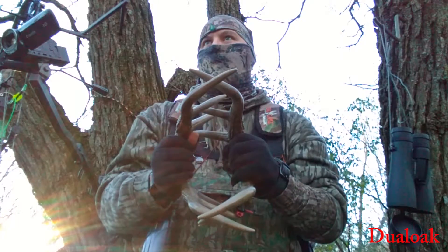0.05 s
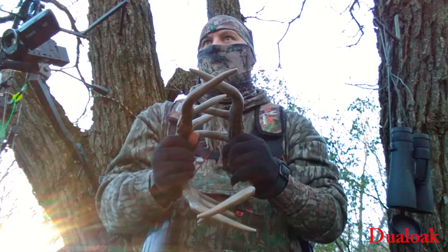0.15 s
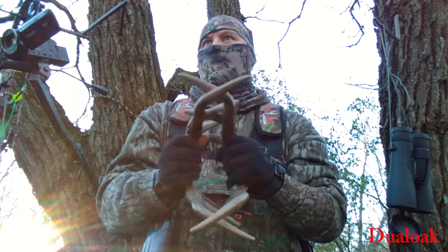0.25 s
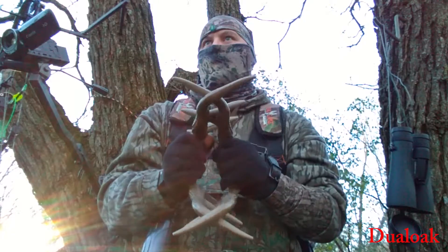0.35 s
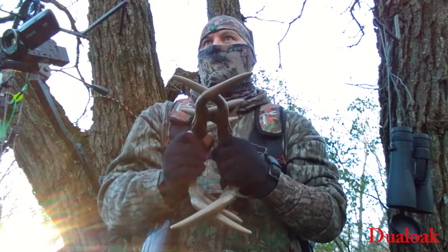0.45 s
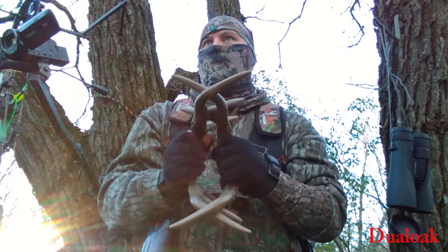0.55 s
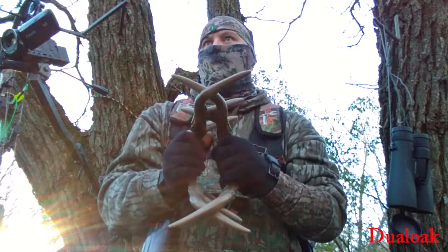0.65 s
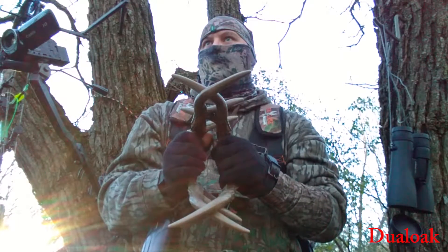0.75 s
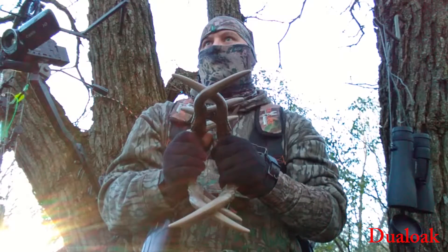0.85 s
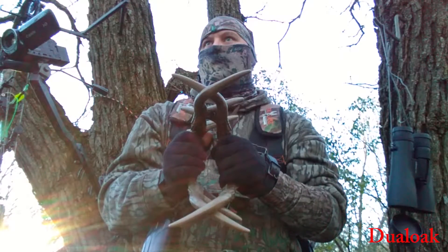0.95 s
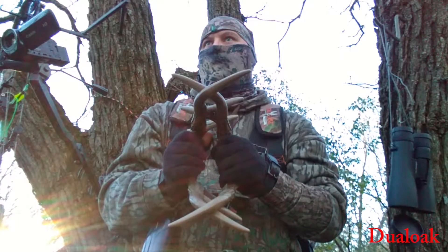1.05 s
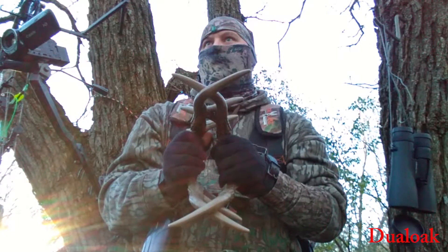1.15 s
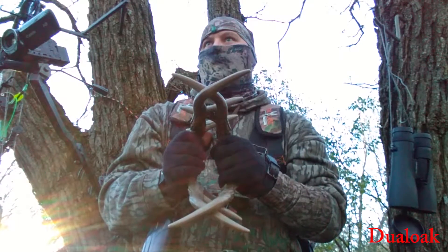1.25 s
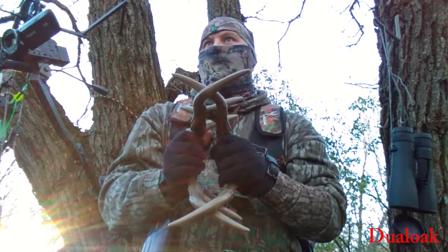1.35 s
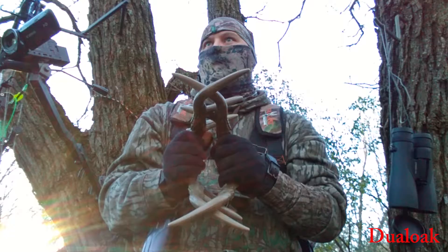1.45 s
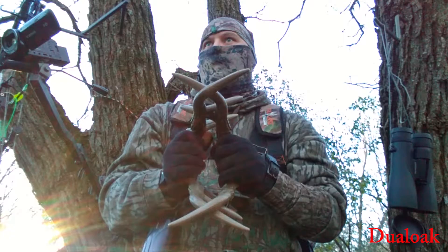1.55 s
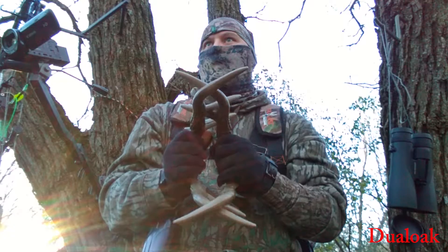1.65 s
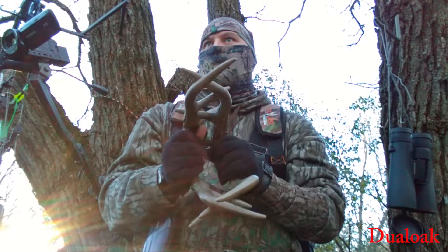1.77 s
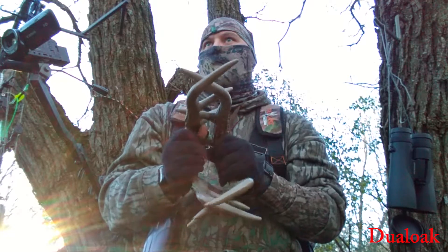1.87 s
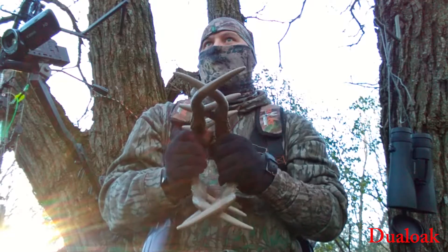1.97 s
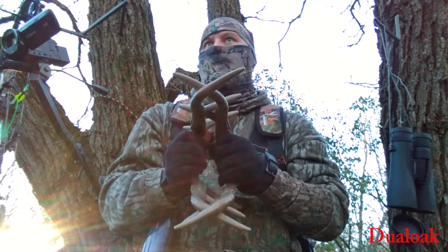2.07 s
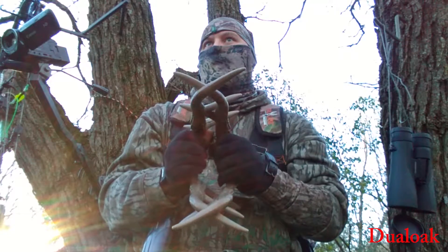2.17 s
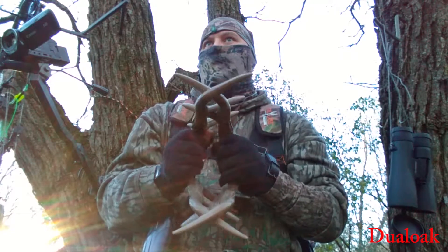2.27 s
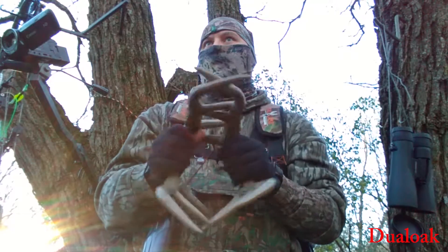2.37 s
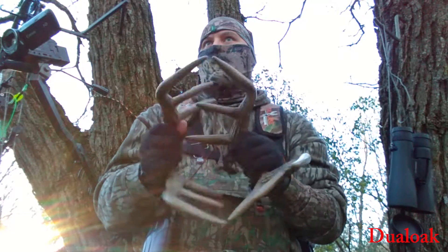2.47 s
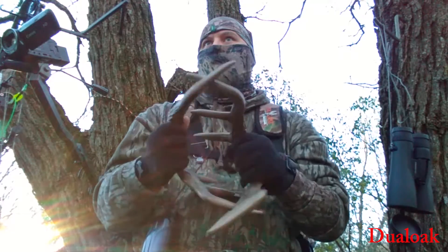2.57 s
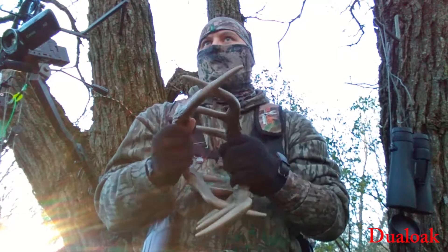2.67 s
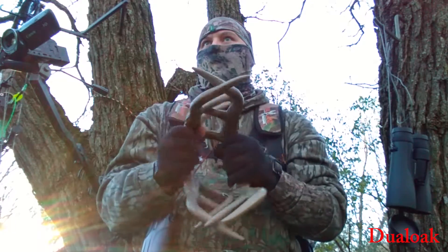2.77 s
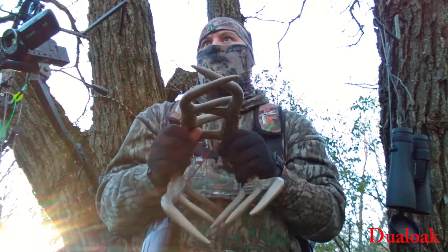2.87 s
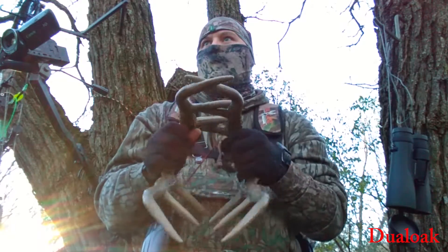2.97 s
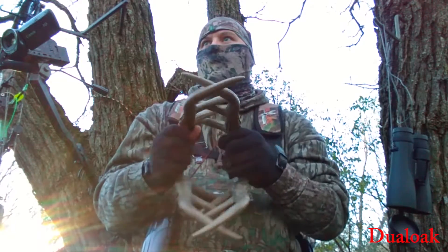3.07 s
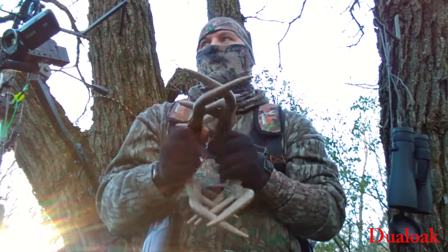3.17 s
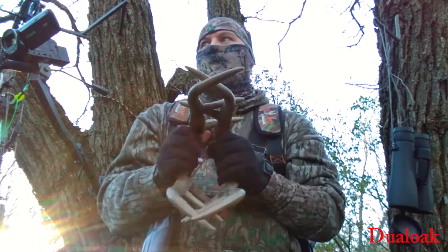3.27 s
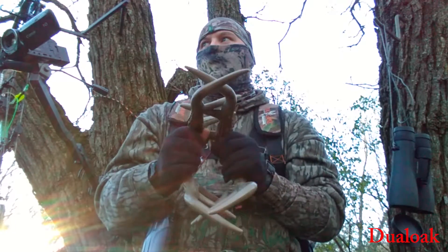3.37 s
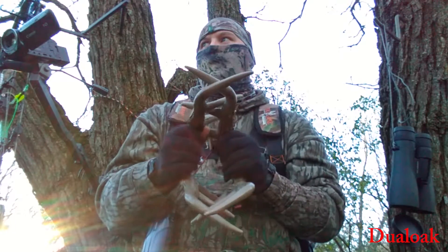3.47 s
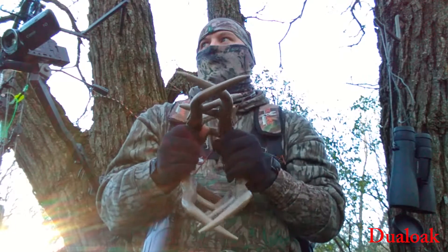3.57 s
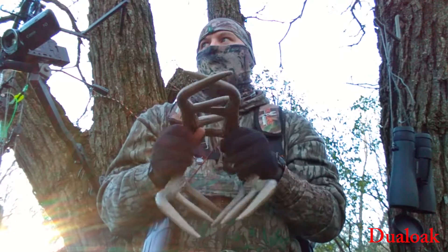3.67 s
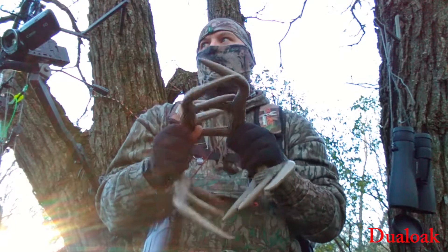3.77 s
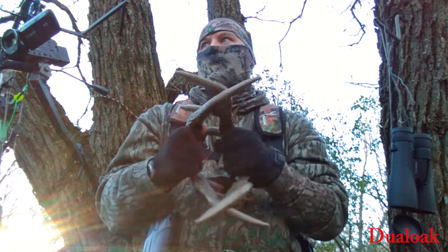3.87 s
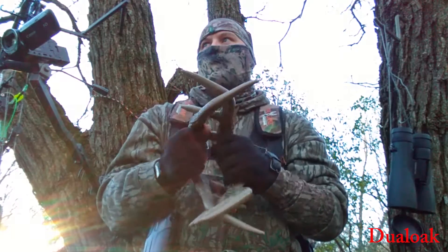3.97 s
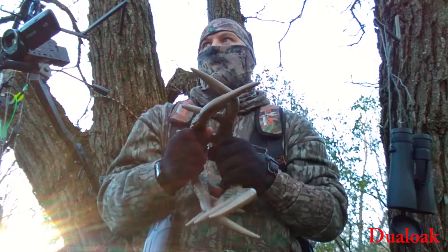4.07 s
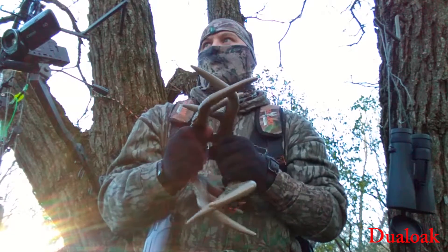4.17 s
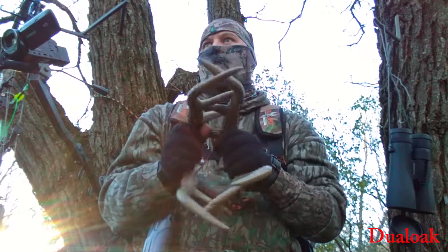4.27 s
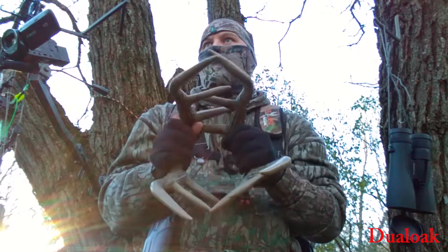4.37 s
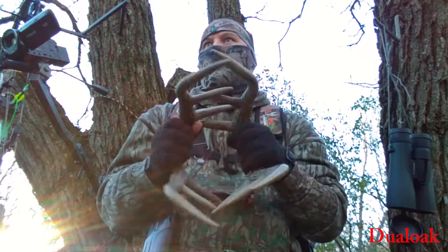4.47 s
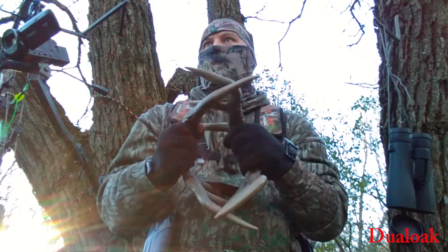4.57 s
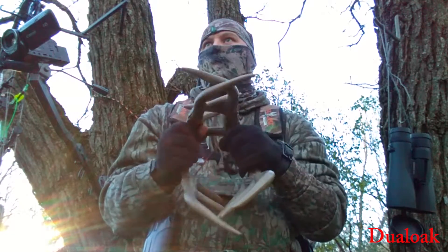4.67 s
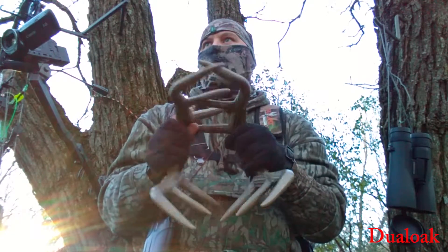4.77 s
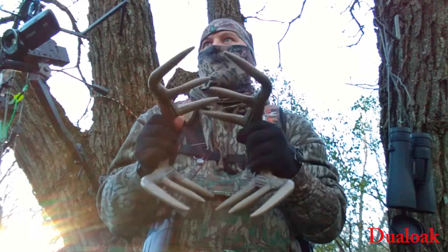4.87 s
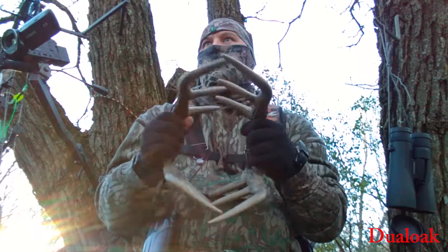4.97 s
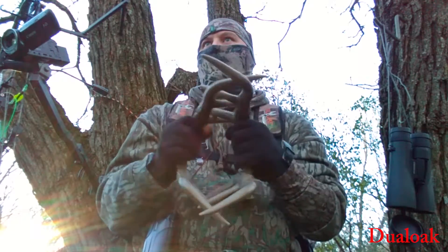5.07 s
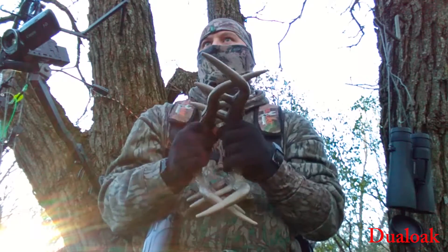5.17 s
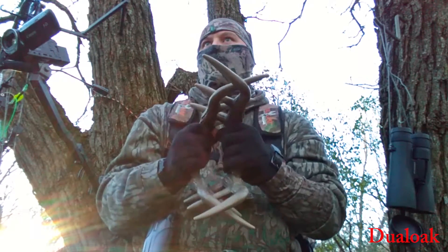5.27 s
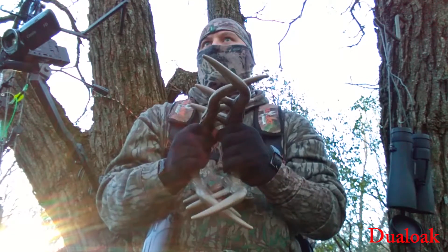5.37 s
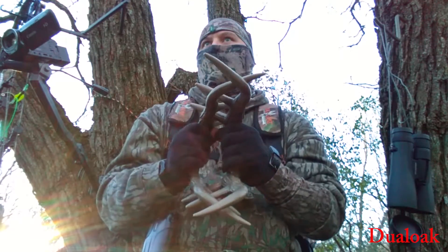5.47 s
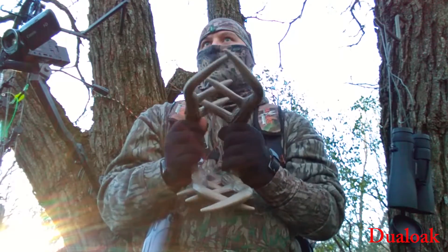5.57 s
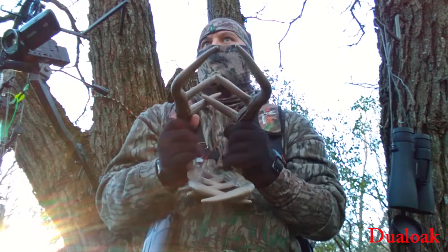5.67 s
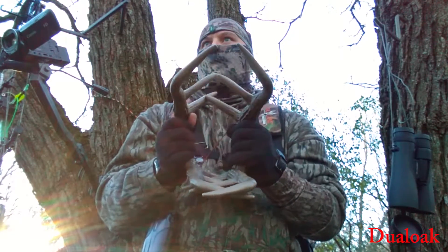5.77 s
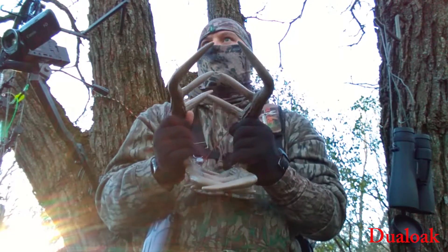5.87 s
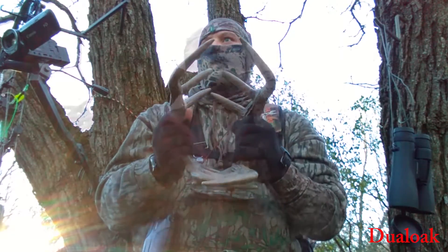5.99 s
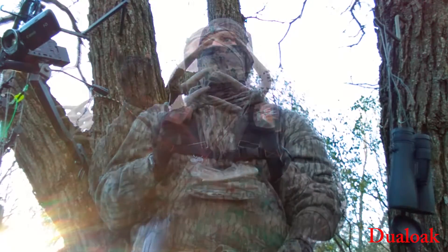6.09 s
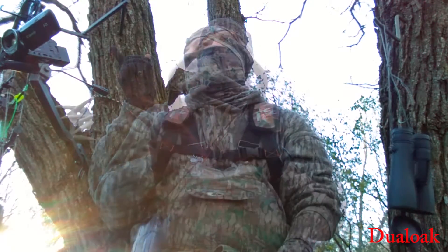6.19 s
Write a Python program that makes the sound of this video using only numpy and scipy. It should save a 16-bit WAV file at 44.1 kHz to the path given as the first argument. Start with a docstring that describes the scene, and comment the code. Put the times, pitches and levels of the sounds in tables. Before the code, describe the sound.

A pair of antlers is worked by hand an arm's length from a stereo microphone in quiet woodland, over faint distant hum and hiss. At 0.3-0.5 s a tight cluster of hard, dry bone clacks sounds. From 0.8 to 1.7 s a gust buffets the microphone with deep, blunt thumps, strongest around 1.1-1.2 s, striking left and right separately. Crisp knocks return at 1.75 and 2.0 s, then 2.4 s. From 2.6 to 3.45 s the clatter is dense and irregular, mixed with rubbing and creaky squeaks, with a sharp snap near 3.2 s and a very loud crack at 3.4 s. Knocks and slides resume at 3.75-4.0 s, looser clusters at 4.5-4.75 s, a strong volley at 5.1-5.2 s, fading scrape, and light taps around 5.6-5.7 s. Thin, diffuse echoes from the trees follow; the end is nearly still.

```python
"""In a wood, an arm's length from a two-port microphone, a pair of antlers is clacked and ground by hand.
A faint far hum and the microphone's hiss lie under a gust that buffets each port separately.
Each contact rings the bone's butts, beams, tines and tips, then rebounds softly; slides scrape and squeak.
Bone is noise forces through modes plus decaying sines; the trees answer with a thin, decaying noise tail."""
import sys
import numpy as np
from scipy import signal
from scipy.fft import rfft, irfft, next_fast_len
from scipy.io import wavfile
from scipy.ndimage import map_coordinates

SR = 44100
rng = np.random.default_rng(int(sys.argv[2]) if len(sys.argv) > 2 else 0)


def digitize_waveform(pressure):
    """Quantize a signal to 16-bit integers and store it at the path in sys.argv[1].

    Rows of a 2-D input are taken as channels; values are limited to [-1, 1].
    """
    field = np.atleast_2d(pressure).T
    bounded = np.clip(field, -1, 1)
    quanta = np.round(bounded * 32767).astype(np.int16)
    wavfile.write(sys.argv[1], SR, quanta)


N = 274787


def amp(db):
    """Decibels to amplitude."""
    return 10 ** (np.asarray(db) / 20)


def unit(x):
    """Scale to an RMS of 1 along the last axis."""
    return x / np.sqrt(np.mean(x ** 2, axis=-1, keepdims=True) + 1e-20)


def along(points, hz):
    """Read (f/Hz, value) points on a log frequency axis."""
    f, v = np.transpose(points)
    return np.interp(np.log(hz + 1), np.log(f + 1), v)


def wobble(rate):
    """A smooth random curve for each channel, rate knots a second."""
    knots = rng.standard_normal((2, int(N * rate / SR) + 4))
    return np.array([map_coordinates(k, [np.arange(N) * rate / SR]) for k in knots])


def filtered(x, response):
    """x times a response of frequency."""
    m = next_fast_len(N + SR // 2)
    return irfft(rfft(x, m) * response(np.fft.rfftfreq(m, 1 / SR)), m)[..., :N]


# Colour of the far hum and hiss: f/Hz, relative density level/dB per Hz
FAR_COLOUR = [(15, -52.5), (25, -26), (128, -7.5), (226, -25.5), (313, -5.5), (669, -17), (766, -16),
              (2820, -28), (3910, -30.5), (14800, -32.5), (16500, -43.5)]
# How alike the two ports hear it: f/Hz, left-right correlation (1 = the same)
FAR_LIKENESS = [(60, 1), (200, 1), (400, 0.41), (800, 0.11), (1500, 0)]


def far():
    """Steady distant hum, alike at both ports, and microphone hiss, unrelated: mid and side noise."""
    def response(hz):
        turn = np.arccos(np.clip(along(FAR_LIKENESS, hz), -1, 1)) / 2
        return amp(along(FAR_COLOUR, hz)) * [np.cos(turn), np.sin(turn)]

    mid, side = filtered(rng.standard_normal((2, N)), response)
    return amp(-63.0) * unit(np.array([mid + side, mid - side]))


# Course of the gust: t/s, buffet level/dB before the layer gains, left over right/dB
GUST_COURSE = [(0, -50.5, -1), (.55, -50, -3.5), (.8, -41, 9.5), (0.929, -42.5, -11), (1.05, -40, 0),
               (1.2, -32, 18), (1.4, -41.5, 0), (1.47, -35, -8.5), (1.62, -38, 3), (1.75, -46, -4),
               (2.3, -60, -3), (2.901, -61, -2), (3.1, -43.5, 2), (3.3, -67, -9), (3.902, -69.5, 5.5),
               (3.999, -50, 1), (4.6, -72, 1), (6.23, -70.5, -3.5)]
# Colour of the buffeting: f/Hz, relative density level/dB per Hz
BUFFET_COLOUR = [(12, -41), (20, -12.5), (91, 1), (169, -6.5), (464, -23.5), (642, -29), (905, -47),
                 (1500, -66), (1950, -92.5), (3300, -120)]
# Large eddies hitting a port: t/s, port (0 left, 1 right), level/dB of the bump without its crest,
# f/Hz setting the bump's speed
EDDIES = [(0.8026, 0, -21, 69), (0.987, 0, -23.5, 149), (1.0181, 1, -23.5, 162), (1.096, 1, -7, 160.6),
          (1.1133, 1, -6, 165), (1.1503, 0, -16.5, 136), (1.1767, 0, -8, 143), (1.195, 0, -15, 73),
          (1.2026, 0, -14.5, 260), (1.2441, 0, -14, 215), (1.2742, 0, -15, 232), (1.436, 1, -21, 220),
          (1.505, 1, -30, 260), (1.541, 0, -26, 200), (1.542, 1, -30, 230), (1.683, 1, -27, 260),
          (1.464, 1, -24, 315), (1.5806, 1, -21.5, 209), (1.6164, 1, -27, 227), (1.6829, 0, -29, 190),
          (2.126, 1, -34.5, 167)]


def wind():
    """Turbulence, unrelated at the two ports: a rumble, a patter of small eddies and single large ones."""
    s, db, pan_db = np.transpose(GUST_COURSE)
    t = np.arange(N) / SR
    left = np.interp(t, s, db + pan_db / 2)
    right = np.interp(t, s, db - pan_db / 2)
    level = amp(np.array([left, right]))
    colour = lambda hz: amp(along(BUFFET_COLOUR, hz))
    rumble = unit(filtered(rng.standard_normal((2, N)), colour) * amp(1.9 * wobble(25)))
    hits = rng.random((2, N)) < 70 / SR  # about 70 small eddies a second at each port
    size = rng.standard_normal((2, N)) * amp(1.2 * rng.exponential(size=(2, N)))
    patter = unit(filtered(hits * size, colour))
    out = level * (amp(-1.5) * rumble + amp(-8) * patter)

    u = np.arange(-1200, 1200) / SR
    crest = (1 - (u / 0.00057) ** 2) * np.exp(-(u / 0.00061) ** 2 / 2)
    for s, port, db, hz in EDDIES:
        v = u * hz * 4.23
        bump = (1 - v * v) * np.exp(-v * v / 2)  # one swing between two opposite ones
        sharp = 0.18 * (hz / 200) ** 2.7  # small fast eddies have the sharper crest
        thump = rng.choice([-1, 1]) * amp(db) * (bump + sharp * crest)
        out[round(port), round(s * SR) - 1200:][:2400] += thump
    return out


def contact_shapes(t):
    """Pressure of a blow, a skid and a fading drag, for butt, beam, tine, tip and crack in turn."""
    def shape(blow_t60, skid_db, skid_t60, drag_db, drag_t60):
        blow = amp(-60 * t / blow_t60)
        skid = amp(skid_db - 60 * t / skid_t60)
        drag = amp(drag_db - 60 * t / drag_t60)
        return (1 - np.exp(-t / .0002)) * (blow + skid + drag)

    low = shape(0.0037, -11.0, 0.065, -26.5, 0.15)
    tine = shape(0.0058, -9.5, 0.05, -23, 0.047)
    tip = shape(0.011, -11.0, 0.038, -20.5, 0.053)
    crack = shape(0.0032, -13.0, 0.029, -28.5, .12)
    return np.array([low, low, tine, tip, crack])


# Contacts: t/s, tine level/dB, beam over tine/dB, tip over tine/dB, then f/Hz of each mode that rings out;
# levels drive the parts before their own gains
CONTACT_ROWS = [(0.317, -34.5, 3.5, -10, 1180), (0.326, -37, 14, -1.5, 1194),
                (0.3341, -14.5, 0, -5.5, 1225, 1610), (0.3411, -20.5, -3, -26, 1176),
                (0.3564, -7.5, 0.5, -6, 2890, 1167, 1610), (0.3688, -22.5, 2, -0.5, 1650),
                (0.4211, -28, 2, -6.5, 2930), (0.4916, -45, 13.5, -14, 1530), (1.7233, -44.5, 1, -22, 649),
                (1.7561, -13, 1.5, -9, 2927, 1420, 690), (1.769, -17, 2.5, -2, 2945, 6700),
                (1.7801, -18.5, -1, -14, 1108), (1.7896, -31.5, 7.5, 1.5, 1200),
                (1.8179, -35.5, 5, 11, 1750), (1.8401, -48.5, 2, 13.5, 1140), (1.943, -30.5, 5, -26, 1164),
                (1.9839, -13.5, -2.5, -7, 2925), (1.9888, -9.5, -3.5, 0, 2920, 4560),
                (2.0052, -22, 12.5, -14.5, 1217), (2.0195, -38, 14, -4.5, 1440),
                (2.0277, -18, -4, -4.5, 3300, 4450), (2.0936, -44, -5, -15, 2950),
                (2.3767, -41.5, 10, -21.5, 2970), (2.3883, -40, 10.5, -12, 3140),
                (2.4048, -11.5, -9.5, -10, 3670, 1787, 2153), (2.415, -36, 11, -18, 1216),
                (2.4441, -34, 3.5, -20.5, 1390), (2.4594, -37, -5, -3, 1440),
                (2.5788, -22, 3.5, -1, 3850, 1421), (2.6004, -25.5, 4, -8.5, 2940, 1540),
                (2.6143, -11, -2.5, 1.5, 4720, 1141, 2498), (2.6459, -17.5, 1.5, -7, 1163, 3101, 2250),
                (2.6606, -21, 0.5, -5, 1152, 3015, 3725), (2.683, -15, 5.5, -9, 2875, 2509, 1475),
                (2.7008, -13, 3, -6.5, 2552, 1141), (2.7509, -24, -3, -1, 2180),
                (2.7694, -34, -5, -15, 2864, 3348), (2.7817, -35, -2.5, -18, 2050),
                (2.807, -22, 8.5, -3, 1906), (2.8355, -31, 10.5, -8, 1126), (2.8496, -36, 9, -21, 1147),
                (2.8814, -14.5, 0.5, -6.5, 1378, 1927, 2200), (2.9028, -30.5, 11, -12.5, 1070),
                (2.917, -26, -4, -12, 1170), (2.9455, -31, 3, -9.5, 1510),
                (3.0361, -16.5, -4, -9, 1228, 2013), (3.0838, -18.5, 1, -4, 1970, 3058),
                (3.109, -20, -5.5, -0.5, 4253, 2003), (3.1661, -15.5, -2.5, 0, 2842, 5168),
                (3.1776, -21, -9.5, 3, 1500), (3.1848, -22.5, 7.5, -9, 1645),
                (3.1914, -16.5, -7.5, -3, 2420, 1809, 1453), (3.234, -22, 4.5, -14.5, 1506),
                (3.2617, -17, 0.5, -10, 926, 2972, 2056), (3.3144, -34.5, 5, -4.5, 1150),
                (3.3427, -16.5, -0.5, -4.5, 1432, 2896), (3.3785, -39, 4.5, -26.5, 1190),
                (3.4117, -4.5, -5.5, -4.5, 1647, 2896), (3.4279, -15, 0, 1.5, 1669, 4134),
                (3.445, -20, -3, 2, 1470), (3.567, -36, 7.5, -16, 1154), (3.6493, -32, 4.5, -27.5, 2915),
                (3.6746, -47.5, 18.5, -10, 1087), (3.695, -45, 12, -15, 1152),
                (3.7478, -20.5, -23.5, -14, 1077, 2283, 3252), (3.7897, -27, -9, -11, 1238, 3176),
                (3.8341, -25.5, 5, -1, 1195, 1572), (3.877, -9, 4.5, -3.5, 1480),
                (3.9022, -44.5, 16, -3, 1190), (3.9205, -31, 12, -10.5, 1505),
                (3.9432, -11.5, -3, -9, 1195, 1475), (3.95, -18.5, 10, -4.5, 1180),
                (3.965, -11.5, 2, -4, 1658, 689), (3.9728, -23.5, 3, -1, 670),
                (4.058, -33, 7.5, -13, 937, 1184), (4.0962, -35.5, 1, -20, 1927),
                (4.1192, -38, -7, -2, 1415), (4.1261, -39.5, -10, 1, 1446), (4.3122, -43, 4, -19.5, 1260),
                (4.366, -23.5, 11.5, -4, 1576), (4.5049, -44.5, 9.5, -8, 1373),
                (4.5235, -20.5, -14, -9, 3758, 3090), (4.575, -29, 2, -20.5, 1530),
                (4.5882, -18.5, 3.5, 0, 1647, 2918, 1389), (4.618, -17.5, -7, -3, 1940),
                (4.627, -35.5, 6, -9, 1990), (4.6373, -30.5, 4, -14.5, 1735),
                (4.699, -30, 3.5, -14.5, 1129), (4.7248, -36.5, 12.5, 7, 1140),
                (4.7462, -14, -20.5, -3, 2638, 1163), (4.7587, -42.5, 19, -32, 2530),
                (4.7887, -41, 16, -10, 1090), (4.8299, -50, 12, -20, 1195), (5.0337, -31, 1.5, 0, 4260),
                (5.0601, -28, 0.5, -4, 2422, 1755), (5.1163, -14, -9.5, -10, 3101, 1981, 2455),
                (5.144, -33.5, 9.5, -25, 1610), (5.1538, -13.5, -7.5, -6, 3122, 2089, 1077),
                (5.166, -19.5, -13, 5, 2060), (5.1693, -7.5, 0, -11, 2013, 3112, 1174),
                (5.1954, -28, 5.5, -22, 1130), (5.2104, -10, -0.5, -4.5, 1453, 1184, 2767),
                (5.234, -40, -15, -11, 1150), (5.256, -42.5, 11, -7, 1460), (5.2794, -56, 12, -10, 1163),
                (5.2996, -59, 13, -5, 1570), (5.6231, -31, 5, -16, 3030),
                (5.627, -24, 1.5, -9.5, 2939, 991), (5.64, -34, 13, -19, 1008), (5.6549, -33, 3, -10, 1427),
                (5.7303, -32.5, -5.5, -14, 3714, 3144, 1529)]
# Sharp treble snaps: t/s, level/dB of the crack's drive
SNAP_ROWS = [(2.698, -33), (3.1782, -13.5)]
# Colour of the contact's crack: f/Hz, relative density level/dB per Hz
CRACK_COLOUR = [(7000, -33), (9000, -7.5), (10000, -7.5), (12000, 4.5), (15000, 0), (17000, -7.5)]
# Bone modes, low to high: f/Hz, relative level/dB, basic t60/s
BONE_MODES = [(496, -5, 0.011), (692, 1.5, 0.036), (915, -2, .015), (1145, 5.5, 0.044), (1430, 1, 0.012),
              (1773, -2, 0.0055), (2037, -0.5, 0.013), (2507, 0, 0.016), (2858, 2.5, 0.017),
              (3075, 2, 0.016), (3444, -3.5, 0.0075), (3770, -2.5, 0.02), (4100, 2.5, 0.0066),
              (4330, -0.5, 0.006), (4604, 1.5, 0.015), (5290, -5.5, 0.0086), (5540, -6, 0.011),
              (6100, -9.5, .01), (6640, -5, 0.0068), (7610, -10.5, 0.0072), (8350, -13.5, 0.0079)]
BUTT, BEAM, TINE, TIP = BONE_MODES[:3], BONE_MODES[3:6], BONE_MODES[6:12], BONE_MODES[12:]


def antlers():
    """Contacts, rebounds and slides push on butts, beams, tines and tips, each at its own strength."""
    t = np.arange(round(.15 * SR)) / SR
    shapes = contact_shapes(t)
    push, ring = np.zeros((5, N + SR)), np.zeros(N + SR)
    for s, db, beam_db, tip_db, *modes in [*CONTACT_ROWS, *rebounds()]:
        at = round(s * SR)
        part_db = np.array([[0.87 * beam_db], [beam_db], [0], [tip_db], [tip_db - 24]])
        push[:, at:at + len(t)] += amp(db + part_db) * shapes
        sines = np.sin(2 * np.pi * np.outer(modes, t)).sum(0) / len(modes) ** .3
        ringing_out = amp(max(beam_db, 0, tip_db) + 1.0 - 60 * t / .035) * sines
        tine_ring = amp(-2.0) * struck(TINE, t, spread_db=4.5)
        tip_ring = amp(tip_db + 1.5) * struck(TIP, t, spread_db=10)
        onset = 1 - np.exp(-t / 0.00052)
        ring[at:at + len(t)] += amp(db) * onset * (ringing_out + tine_ring + tip_ring)
    for s, db in SNAP_ROWS:
        push[4, round(s * SR):][:len(t)] += amp(db) * shapes[4]

    slide, squeak = strokes()
    push = push[:, :N] + amp([[-14], [-5.5], [-9], [-13], [-24]]) * slide
    butt = resonate(slips(push[0], apart=.45, lumps_db=2.5), BUTT, low_hz=250, high_hz=2500)
    beam = resonate(slips(push[1], apart=0.23, lumps_db=4.5), BEAM, low_hz=530, high_hz=4000)
    tine = resonate(slips(push[2], apart=0.65, lumps_db=2.5), TINE, low_hz=920, high_hz=8200)
    tip = resonate(slips(push[3], apart=0.91, lumps_db=2.0), TIP, low_hz=2110, high_hz=12000)
    edge = lambda hz: unit(amp(along(CRACK_COLOUR, hz)))
    crack = filtered(slips(push[4], apart=0.92, lumps_db=3.0), edge)
    grit = lambda hz: unit(1 / (1 + 1500 / (1j * hz + 1e-9)) ** 2 / (1 + 1j * hz / 8000) ** 4)
    scrape = filtered(slips(slide, apart=0.85, lumps_db=4.5), grit)  # the dry hiss of the rough surfaces
    bone = amp(-5) * butt + amp(2.0) * beam + amp(2.5) * tine + amp(3.5) * tip
    bone = bone + amp(4.0) * crack + ring[:N] + squeak + amp(-17.0) * scrape
    # the left port is a little nearer: 7 microseconds early, the right as much late
    lead = lambda hz: np.exp(2j * np.pi * hz * 7e-6 * np.array([[1], [-1]]))
    return filtered(bone, lead)


def slips(envelope, apart, lumps_db):
    """Rough bone on bone: a lumpy noise force, part common to both ports and part (apart) their own."""
    common, own = rng.standard_normal(N), rng.standard_normal((2, N))
    noise = (common + apart * own) / np.hypot(1, apart)
    return envelope * amp(lumps_db * wobble(260)[0]) * noise


def resonate(force, modes, low_hz, high_hz):
    """A force through one part of the bone; the part radiates little outside its own range."""
    def response(f):
        peaks = 0
        for k, (hz, db, t60) in enumerate(modes):
            t60 = min(t60, 70 / hz)  # no mode outlasts 70 cycles
            damping = 1j * f * np.log(1000) / np.pi / t60
            peaks = peaks + (-1) ** k * amp(db) * 1j * f / t60 / (hz * hz - f * f + damping)
        levelled = unit(np.abs(peaks)) * np.exp(1j * np.angle(peaks))
        return levelled / (1 + low_hz / (1j * f + 1e-9)) ** 3 / (1 + 1j * f / high_hz) ** 3

    return filtered(force, response)


def struck(modes, t, spread_db):
    """Free ringing after one blow: where it lands sets every mode's strength anew; energy of one sine."""
    hz, db, t60 = np.transpose(modes)[..., None]
    size = amp(db + spread_db * rng.standard_normal(db.shape))
    decay = amp(-60 * t / (1.2 * t60))
    return np.sum(size * decay * np.sin(2 * np.pi * hz * t), axis=0) / np.linalg.norm(size)


def rebounds():
    """Rows like the contacts: one softer, duller touch soon after each, ringing a beam mode."""
    soonest_s, mean_extra_s, loss_db, scatter_db = .007, .006, 27, 2
    s, db, beam_db = np.transpose([row[:3] for row in CONTACT_ROWS])
    wait, choice = rng.random((len(s), 2)).T
    size, beam, tip, bend = rng.standard_normal((len(s), 4)).T
    when = s + soonest_s - mean_extra_s * np.log(1 - wait)
    level = db + np.maximum(beam_db, 0) - loss_db + scatter_db * size
    beam_hz = np.array([hz for hz, _, _ in BEAM])
    mode_hz = beam_hz[(choice > .7).astype(int)] * (1 + .04 * bend)
    return np.transpose([when, level, 8.5 + 2.1 * beam, -12.5 + 6 * tip, mode_hz])


# Sliding strokes: start t/s, end t/s, pressure level/dB before the part gains,
# squeak f/Hz at the start, squeak f/Hz at the end (both before the pitch wobble)
STROKE_ROWS = [(0.498, 0.522, -68, 1220, 1200), (1.96, 2.02, -56.5, 1300, 1480),
               (2.045, 2.136, -63.5, 1240, 1270), (2.406, 2.484, -51.5, 1180, 1230),
               (2.585, 2.788, -54.5, 1186, 1123), (2.822, 2.974, -52.5, 1150, 1170),
               (3.379, 3.396, -54, 1020, 1170), (3.65, 3.705, -58, 1130, 1150), (3.7, 3.75, -58, 990, 1130),
               (3.754, 3.798, -64, 1060, 1230), (3.831, 3.958, -54, 1160, 1170),
               (3.996, 4.095, -60.5, 1210, 1180), (4.269, 4.371, -60.5, 1150, 1180),
               (4.361, 4.475, -59.5, 1560, 1380), (4.525, 4.599, -53.5, 1600, 1400),
               (4.62, 4.699, -57.5, 1907, 1705), (4.755, 4.851, -55, 1118, 1174),
               (5.21, 5.319, -61, 1200, 1180), (5.584, 5.629, -64.5, 970, 1020)]


def strokes():
    """One antler slides on the other: pressure swells and fades, and stick-slip squeaks at a gliding pitch."""
    t = np.arange(N) / SR
    pressure, pitch = np.zeros(N), np.zeros(N)
    for start, end, db, from_hz, to_hz in STROKE_ROWS:
        part = np.clip((t - start) / (end - start), 0, 1)
        pressure += amp(db) * np.sin(np.pi * part) ** .5
        pitch = np.where(part > 0, from_hz + (to_hz - from_hz) * part, pitch)
    pitch = pitch * (1 + 0.028 * wobble(30)[0] + 0.04 * wobble(180)[0])
    squeak_level = pressure * amp(5.2 + 3.3 * wobble(83)[0])
    return pressure, squeak_level * np.sin(2 * np.pi * np.cumsum(pitch) / SR)


def tail(decays, seconds):
    """A stereo noise tail of energy 1 a channel whose frequencies die at their own speeds."""
    noise = rng.standard_normal((2, round(seconds * SR)))
    hz, t, z = signal.stft(noise, SR, nperseg=128)
    fade = amp(-60 * t / np.abs(along(decays, hz))[:, None])
    out = signal.istft(z * fade, SR, nperseg=128)[1]
    return out / np.linalg.norm(out, axis=1, keepdims=True)


# Decay of the wood's answer: f/Hz, t60/s
TREE_DECAY = [(300, 1), (1500, 0.4), (3000, .55), (5000, 0.45), (12000, 0.6)]
# Colour of the wood's answer: f/Hz, level/dB
TREE_COLOUR = [(1200, -3), (1900, -3), (2950, 1.5), (4500, -1), (7000, -6), (12000, -13)]


def trees(x):
    """The long, thin answer of the wood: a blurred, decaying noise tail, drawn anew every third of a second."""
    blurred = x.mean(0) * (0.3 + .9 * wobble(900)[0])
    answer, step = np.zeros((2, N + 2 * SR)), SR // 3
    for at in range(0, N, step):
        echo = signal.fftconvolve(blurred[None, at:at + step], tail(TREE_DECAY, .7), axes=1)
        answer[:, at + 700:][:, :echo.shape[1]] += echo  # 700 samples: about 16 ms late
    return filtered(answer[:, :N], lambda hz: amp(along(TREE_COLOUR, hz)))


def scene():
    """The antlers, the wood's answer, the wind at the ports and the far hum with hiss."""
    bone = antlers()
    return bone + amp(-22.5) * trees(bone) + wind() + far()


def record(dry):
    """The loudest blows meet the converter's soft ceiling; nothing is kept above the band limit."""
    ceiling, top_hz = 1.05, 16700
    clipped = dry / (1 + np.abs(dry / ceiling) ** 8) ** (1 / 8)
    return filtered(clipped, lambda hz: np.clip((top_hz - hz) / 300, 0, 1) ** 2)


dry = scene()
out = record(dry)
digitize_waveform(out)
```